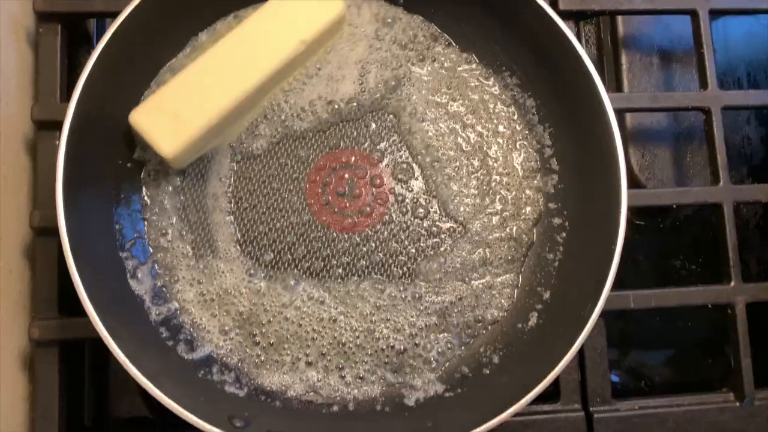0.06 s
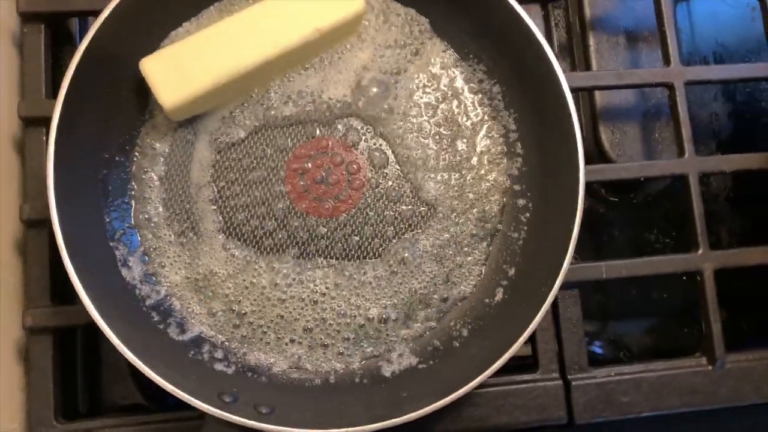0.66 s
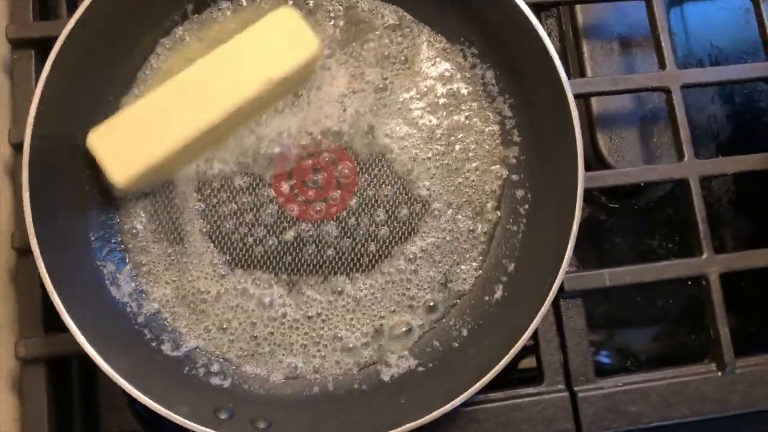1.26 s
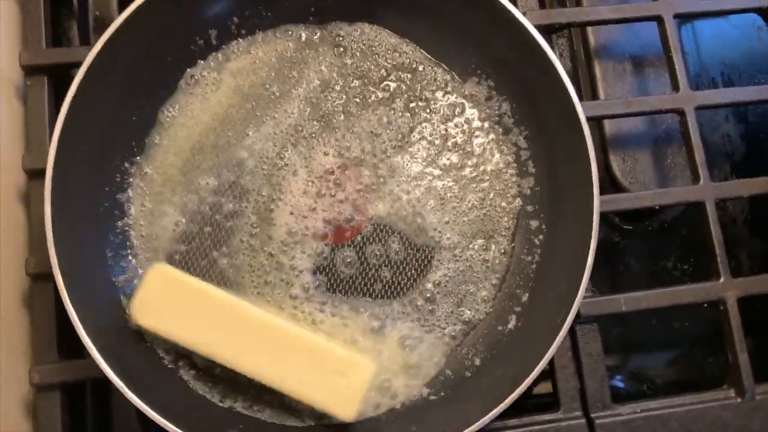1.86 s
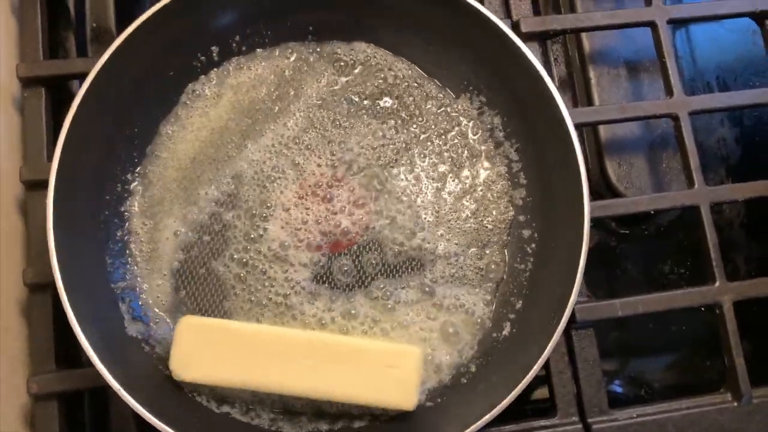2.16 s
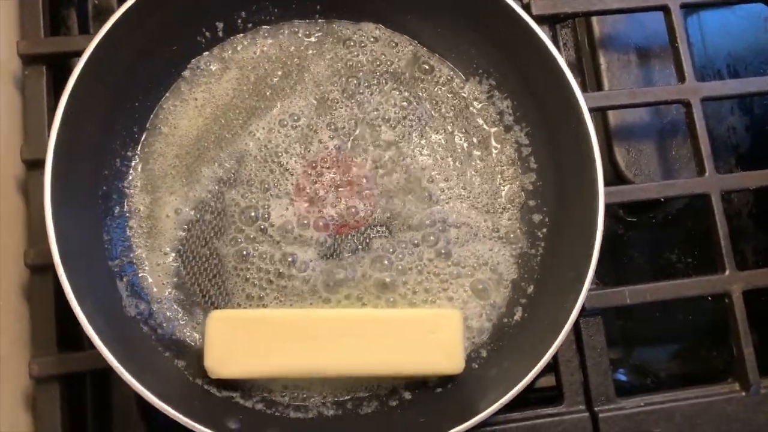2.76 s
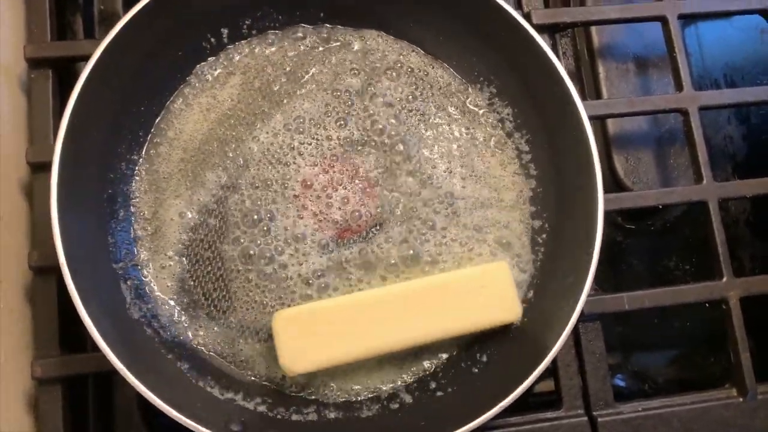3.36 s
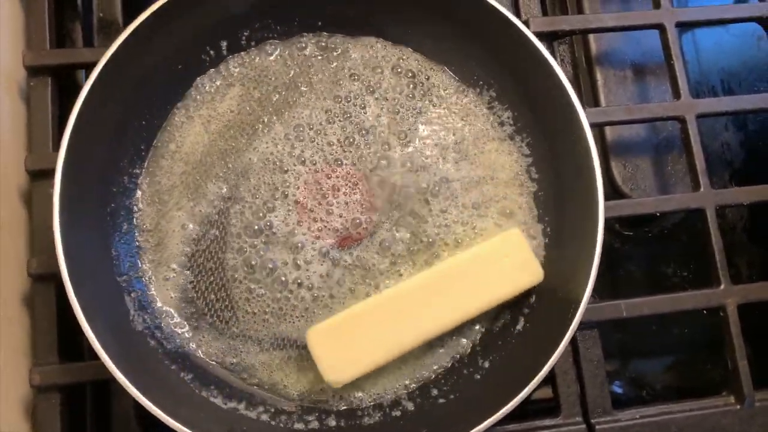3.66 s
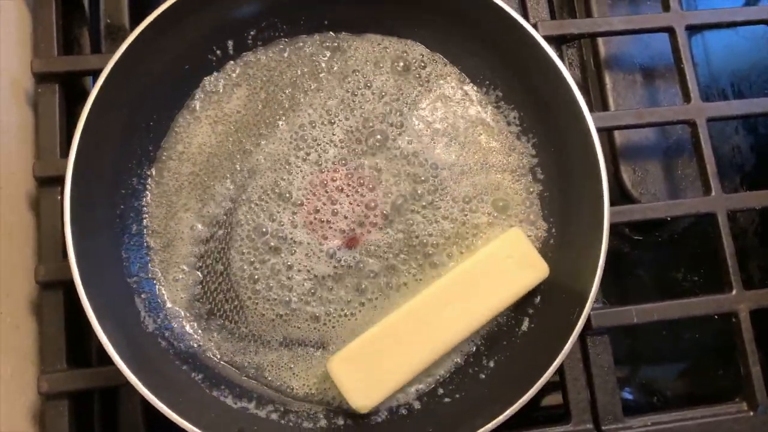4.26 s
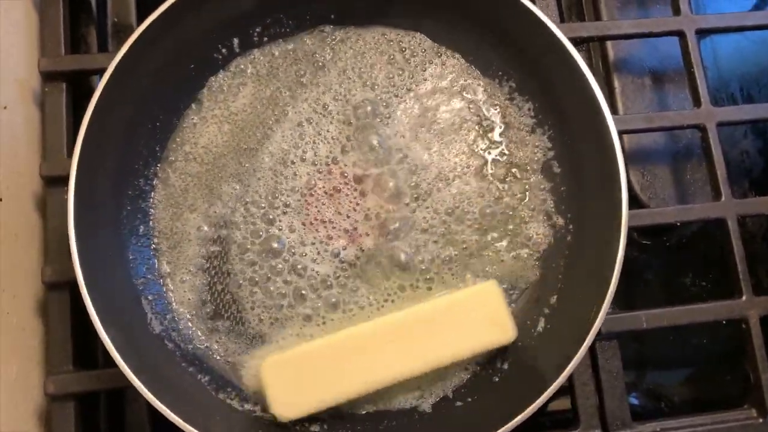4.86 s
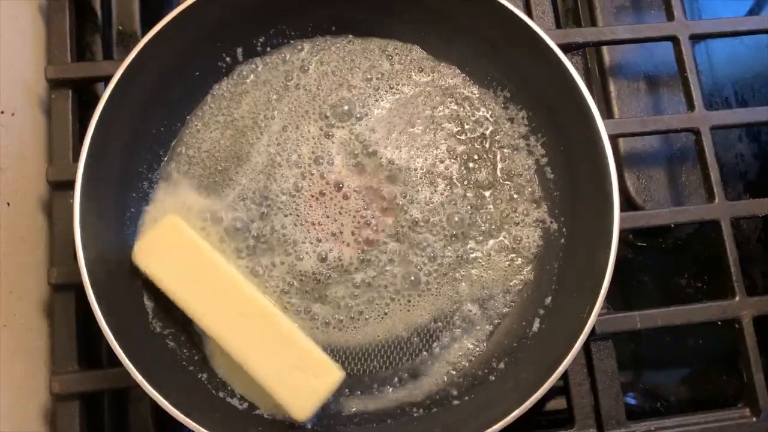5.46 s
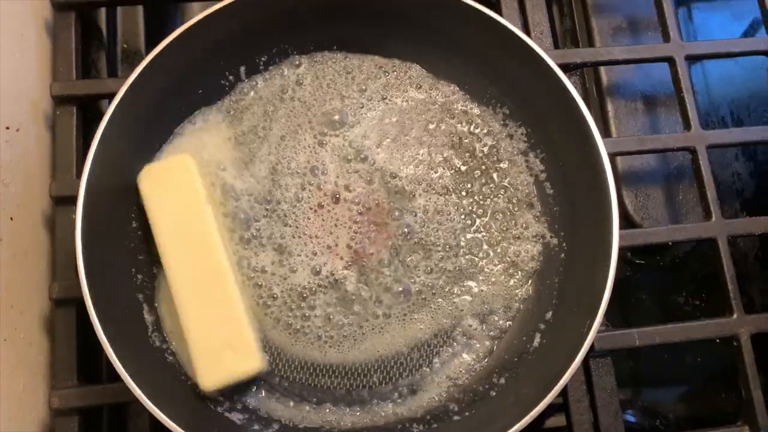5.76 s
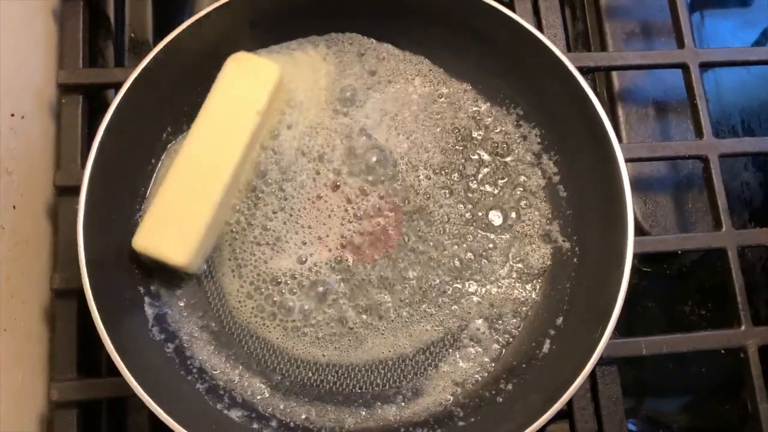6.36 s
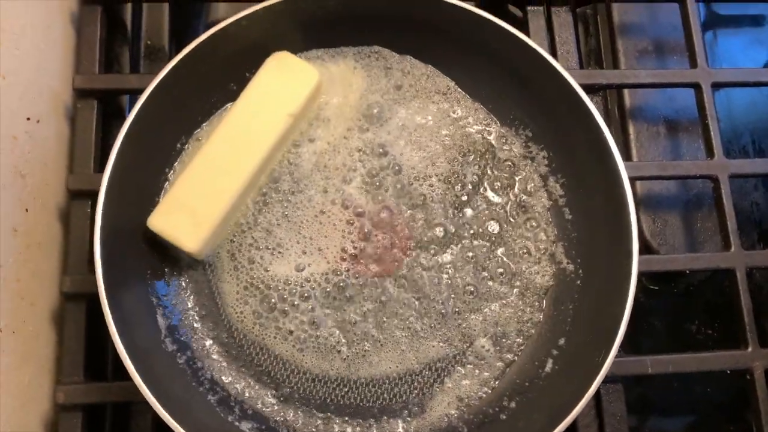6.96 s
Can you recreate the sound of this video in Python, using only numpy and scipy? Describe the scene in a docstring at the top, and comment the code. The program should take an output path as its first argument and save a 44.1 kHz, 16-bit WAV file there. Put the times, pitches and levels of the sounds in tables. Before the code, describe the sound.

Butter sizzles in a frying pan on a gas stove, a steady bright hiss of tiny bursting bubbles with sharp little spits and brief spurts of steam. Three times the pan knocks and rocks on the iron grate, with short metallic clacks and hollow thuds. The sizzle grows loudest near the end. A low burner murmur lies underneath, heard through a close stereo microphone in a small kitchen.

```python
"""Butter sizzles in a frying pan: countless small steam bubbles burst in the foam, some ring, a few spit
louder, and trapped steam escapes in crackling spurts. The pan is tilted about on the iron grate of a gas
stove; now and then it knocks and rocks, ringing with the bar it touches, and the hollow stove thuds.
The stove murmurs underneath. Close stereo microphone, small kitchen."""
import sys
import numpy as np
from scipy import signal
from scipy.fft import rfft, irfft, next_fast_len
from scipy.io import wavfile

SR = 44100
rng = np.random.default_rng(int(sys.argv[2]) if len(sys.argv) > 2 else 0)


def generate_wav(sig):
    """Save sig (samples, or channels by samples) to the path in sys.argv[1] as 16-bit PCM at SR."""
    pcm = np.round(np.clip(np.atleast_2d(sig).T, -1, 1) * 32767).astype(np.int16)
    wavfile.write(sys.argv[1], SR, pcm)


N = 309140
FFT_SIZE = next_fast_len(N + SR)
FREQ_HZ = np.maximum(np.arange(FFT_SIZE // 2 + 1) * SR / FFT_SIZE, 1)
TIME_S = np.arange(N) / SR

# burner and kitchen (frequency [Hz], relative density [dB])
MURMUR_SPECTRUM = [(15, -53), (25, -61), (47, -1.5), (102, -1.5), (134, -7.5), (171, -4.5), (197, -16),
                   (251, -1), (393, -12.5), (426, -10.5), (516, -28), (559, -11.5), (689, -17.5),
                   (835, -20), (1150, -24.5), (1500, -19), (2530, -120)]
# faint hum (time [s], level [dB])
HUM_LEVEL = [(0, -56), (5.2, -79), (5.8, -53), (7, -52.5)]
# hollow stove under a blow (frequency [Hz], relative density [dB])
THUD_SPECTRUM = [(45, -36), (80, -5), (130, -1), (175, -1), (225, -1.5), (320, 4), (520, -9), (800, -12.5),
                 (1600, -18), (3000, -39)]
# pan lands or rocks onto another bar; levels relative (time [s], blow [dB], contact cutoff [Hz],
# rattle [dB], bar pitch [Hz], bar level [dB], bar t60 [s], partial 2 [Hz], level 2 [dB],
# partial 3 [Hz], level 3 [dB], stove heave [dB], stove thud [dB], free ring [dB])
KNOCKS = [(0.439, -26.5, 2500, -11, 1000, -13, 0.049, 1786, -27, 2030, -33, -50, -30, -31),
          (0.537, -31, 2380, 1, 1040, -18, 0.062, 1265, -27, 2100, -31, -54, -34.5, -12),
          (0.684, -21, 4300, 1, 876, -18, 0.069, 1900, -20.5, 2770, -27, -36.5, -30, -19),
          (0.762, -35.5, 1510, -1, 830, -40, 0.062, 1600, -44, 1870, -43, -45, -41.5, -31),
          (2.021, -50, 650, 1, 554, -34.5, 0.1, 1110, -56, 1500, -58, -49, -45.5, -51),
          (2.104, -25.5, 2100, -3, 844, -13, 0.14, 1533, -22.5, 1635, -25, -39, -36, -48),
          (2.207, -39, 1500, 5, 870, -32, 0.053, 1030, -36, 1560, -49, -41.5, -46.5, -47),
          (3.865, -34, 1350, 6, 797, -27, 0.16, 712, -27, 1276, -35, -58, -43, -52),
          (3.955, -40, 1300, 0, 796, -29.5, 0.07, 712, -34, 1280, -41, -60, -53, -56),
          (4.1242, -23.5, 2140, 8, 815, -17.5, 0.058, 1680, -25, 683, -31, -36.5, -35, -29),
          (4.176, -33, 1100, 1, 815, -33, 0.056, 710, -33, 1716, -42, -57, -48, -47)]
# struck pan and grate (frequency [Hz], relative level [dB], t60 [s])
PAN_MODES = [(173.6, -9.5, 0.18), (331, -6, 0.32), (460, -1.5, 0.14), (555, 0, 0.14), (730, -3, 0.056),
             (815, -7.5, 0.16), (996, -7.5, 0.16), (1283, -3.5, 0.055), (1478, -1.5, 0.09),
             (1594, -11, 0.26), (1750, -12, 0.16), (1820, -10, 0.29), (1980, -27, 0.28), (2410, -22, 0.17),
             (2616, -11, 0.099), (2897, -5, 0.12), (3430, -12, 0.22), (3710, -13, 0.22), (3700, -1, 0.07),
             (3920, -5, 0.065), (3960, -11, 0.19)]
# pan lifting off a bar (frequency [Hz], relative level [dB], t60 [s])
FREE_MODES = [(171.5, -6, 0.3), (560, -3, 0.26)]
# pan stirred by the frying (frequency [Hz], level [dB], t60 [s])
SINGING_MODES = [(827, -61.5, 0.082), (1005, -65.5, 0.064), (1546, -64.5, 0.025)]
# steam escapes (time [s], swell [s], level [dB], centre [Hz])
SPURTS = [(0.195, 0.0067, -30, 12500), (0.208, .004, -33, 6860), (0.262, 0.005, -29, 3800),
          (1.030, .006, -38, 3500), (1.089, 0.0087, -36, 3740), (1.150, 0.011, -41, 3630),
          (1.315, 0.0086, -40, 3700), (1.348, 0.0042, -44, 6800), (1.372, 0.0058, -47, 3300),
          (1.439, .005, -35.5, 6300), (1.792, 0.0051, -33, 12000), (2.327, 0.0054, -33, 12500),
          (2.541, .004, -32, 12000), (3.361, .003, -29, 11900), (3.465, .004, -32, 4200),
          (3.631, .004, -29.5, 12000), (3.849, .003, -36, 12500), (4.119, .012, -42, 4100),
          (4.296, .005, -33, 12600), (5.006, 0.0028, -41, 12000), (5.06, 0.0027, -32, 12000),
          (5.061, 0.0055, -30, 5800), (5.064, 0.0056, -32, 4000), (5.442, 0.0052, -37, 4500),
          (5.455, 0.0061, -40, 12500), (5.722, 0.0023, -38, 12500), (6.119, .007, -33, 12600),
          (6.772, .004, -27, 4600)]
# loudest spits of fat (time [s], relative peak [dB], pitch [Hz])
SPITS = [(0.090, -24, 7000), (0.214, -19, 6900), (0.379, -23, 8500), (0.7103, -20, 6330),
         (0.8046, -17.5, 6940), (0.829, -24, 7500), (0.8445, -16.5, 8200), (0.9073, -23, 6610),
         (0.921, -19, 13000), (0.9517, -18.5, 6890), (1.006, -25, 7700), (1.054, -23, 7400),
         (1.100, -22, 7300), (1.1283, -23, 7140), (1.1915, -19, 11500), (1.4935, -24, 12500),
         (1.541, -23, 8900), (1.5705, -25, 12500), (1.918, -20, 6250), (2.2498, -21, 6730),
         (2.3171, -17, 6950), (2.349, -19, 6800), (2.4264, -21, 7990), (2.5426, -20, 6190),
         (2.7107, -20, 6470), (3.3643, -22, 6900), (3.560, -21, 11500), (3.8501, -21, 6170),
         (3.851, -18, 12500), (3.8675, -21, 12000), (3.9784, -19, 6270), (4.0996, -19.5, 6240),
         (4.1755, -22, 12000), (4.1815, -19, 7300), (4.2255, -20, 6800), (4.4812, -22, 7220),
         (4.5984, -21, 6600), (4.5995, -19.5, 9500), (4.7357, -21, 11500), (5.0095, -19.5, 6910),
         (5.0105, -21, 11500), (5.0609, -22, 6310), (5.225, -24, 6790), (5.236, -23, 6500),
         (5.3835, -20, 11500), (5.497, -22, 8200), (5.5755, -19.5, 11000), (5.7074, -20, 6300),
         (5.7235, -18, 12000), (5.8935, -19.5, 6730), (6.2287, -19, 6140), (6.3185, -17, 6330),
         (6.4502, -17, 7100), (6.8947, -14, 7240)]
# tone of the frying (frequency [Hz], gain [dB])
FRY_SPECTRUM = [(1000, -19.5), (1600, -10), (1950, -13.5), (2300, -4), (3100, -5), (3800, -2), (4650, 3.5),
                (5250, -1.1), (6300, 4.5), (7300, 0.24), (8500, -1.5), (10300, -6), (13000, -3),
                (15500, -17.5)]
# frying surges as melted butter runs onto hot metal (time [s], vigour [dB])
VIGOUR = [(0.01, -36), (0.6, -37.5), (1.13, -37.5), (1.25, -39.5), (1.35, -38), (1.53, -40.5),
          (1.99, -32.5), (2.15, -35.5), (2.33, -30.5), (2.47, -33.5), (2.93, -31.5), (3.19, -34),
          (3.7, -34), (4.27, -34.5), (4.41, -36), (4.59, -33.5), (4.68, -38), (4.97, -39), (5.11, -36),
          (5.33, -38), (5.44, -32.5), (5.63, -34), (6.12, -30), (6.39, -27), (6.62, -27.5), (6.92, -26)]
# large bubbles to fine spray (pitch [Hz], change under foam [dB], growth in fierce frying [dB/dB])
BUBBLES = [(2050, 4, 0), (3740, 7.5, -0.43), (4430, 11.5, 0.44), (6980, 0, 1.2954), (13300, -11, 1.11)]
# low noise, left against right (frequency [Hz], correlation [-1..1])
LOW_CORRELATION = [(60, 0.89), (250, 0.91), (420, 0.16), (620, -0.48), (1000, -0.67), (1500, 0.016)]
# pan to microphone (frequency [Hz], left lead [rad], left minus right [dB])
PAN_PATH = [(100, 0, 0), (380, -.3, 0), (560, -1.6, -4), (850, -1.9, -7), (1050, -1.1, -3), (1500, .7, -3),
            (1900, .6, -3), (4000, 1.2, -1.5)]
# frying to microphone (frequency [Hz], left lead [rad])
FRY_LEAD = [(0, 0), (700, -2), (1500, .7), (1900, .4), (2200, -3.2), (4850, -3.14), (7300, 0),
            (22050, 18.35)]
# frying that arrives directly (frequency [Hz], power share [0..1])
DIRECT_SHARE = [(1000, 0.45), (2200, 0.7), (3000, 0.1), (3800, 0.3), (4650, 0.9), (5400, 0.55), (6500, .9),
                (15000, .92)]
# whole kitchen (frequency [Hz], left minus right [dB])
BALANCE = [(60, -1), (200, -2.5), (380, 3), (700, -1), (1300, -2.5), (2400, -0.5), (5000, -0.3)]

BUBBLE_HZ = [row[0] for row in BUBBLES]
PIP_LOW_HZ, PIP_HIGH_HZ = 2600, 15000


def from_db(db):
    """Decibels to gain."""
    return 10 ** (np.asarray(db) / 20)


def unit_rms(x):
    """Scale to unit power."""
    return x / np.sqrt(np.mean(x ** 2) + 1e-20)


def over_time(table):
    """Time curve at every sample."""
    return np.interp(TIME_S, *np.transpose(table))


def at_hz(table, hz):
    """Table lookup on a log-frequency axis."""
    table_hz, values = np.transpose(table)
    return np.interp(np.log(hz), np.log(table_hz), values)


def shaped(x, response):
    """Filter by a frequency response."""
    return irfft(rfft(x, FFT_SIZE) * response, FFT_SIZE)[..., :N]


def butter(x, order, edge_hz, kind="low"):
    """Maximally flat filter."""
    return signal.sosfilt(signal.butter(order, edge_hz, kind, fs=SR, output="sos"), x)


def drift(rate_hz):
    """Smooth random curve, unit RMS."""
    hop, settle = 40, 2000
    r = np.exp(-2 * np.pi * rate_hz * hop / SR)
    slow = signal.lfilter([1], [1, -2 * r, r * r], rng.standard_normal(N // hop + settle + 2))[settle:]
    return np.interp(np.arange(N) / hop, np.arange(len(slow)), unit_rms(slow))


def ring(drive, hz, t60_s):
    """Resonator: a unit click starts a decaying unit sine."""
    r, w = from_db(-60 / (t60_s * SR)), 2 * np.pi * hz / SR
    return signal.lfilter([0, np.sin(w)], [1, -2 * r * np.cos(w), r * r], drive + 1e-18)


def add(out, time_s, sound):
    """Mix a sound in at time_s."""
    start = int(np.clip(round(time_s * SR), 0, N - 1))
    out[start:start + len(sound)] += sound[:N - start]


def low_noise(spectrum):
    """Coloured stereo noise, alike on both sides in the bass."""
    mid, side = rng.standard_normal((2, N))
    alike = at_hz(LOW_CORRELATION, FREQ_HZ)
    rolloff = (1 + (FREQ_HZ / spectrum[-1][0]) ** 4) * (1 + (20 / FREQ_HZ) ** 4)
    gain = from_db(at_hz(spectrum, FREQ_HZ)) / rolloff
    mid, side = shaped(mid, gain * np.sqrt(1 + alike)), shaped(side, gain * np.sqrt(1 - alike))
    return unit_rms(mid + side * [[1], [-1]])


def kitchen(t60_s=0.25, near_s=0.006, near_db=8):
    """Stereo room response: dense reflections off the stove, then a soft tail."""
    t = TIME_S[:SR // 2]
    fade = (from_db(-60 * t / t60_s) + from_db(near_db) * np.exp(-t / near_s)) * (t > 0.001)
    echoes = rng.standard_normal((2, len(t))) * fade
    return rfft(echoes / np.sqrt(np.sum(echoes ** 2, axis=1, keepdims=True)), FFT_SIZE)


def murmur(hum_hz=103):
    """Steady noise of burner and kitchen, plus a faint hum."""
    hum = np.sqrt(2) * np.sin(2 * np.pi * hum_hz * TIME_S + 0.18 * drift(0.64))
    return from_db(-47.5) * low_noise(MURMUR_SPECTRUM) + from_db(over_time(HUM_LEVEL)) * hum


def stove_heaves(hz=73.7, delay_s=0.0592, swell_s=0.022):
    """The stove gives under the pan's weight and sways for a few cycles."""
    out, t = np.zeros(N), TIME_S[:SR // 2]
    sway = np.sin(2 * np.pi * hz * t) * t / swell_s * np.exp(1 - t / swell_s)
    for time_s, *_, heave_db, _, _ in KNOCKS:
        add(out, time_s + delay_s, from_db(heave_db) * sway)
    return out


def stove_thuds(rise_s=0.0072, t60_s=0.39):
    """The hollow stove answers each knock and rumbles on."""
    power, t = np.zeros(N), TIME_S[:SR]
    swell = from_db(-60 * t / t60_s) * (1 - np.exp(-t / rise_s)) ** 2
    for time_s, *_, thud_db, _ in KNOCKS:
        add(power, time_s, (from_db(thud_db) * swell) ** 2)
    return np.sqrt(power) * low_noise(THUD_SPECTRUM)


def pan_singing(vigour_exponent=0.63):
    """Bursts on the pan's floor keep a few modes faintly ringing."""
    modes = sum(from_db(db) * unit_rms(ring(rng.standard_normal(N), hz, t60_s))
                for hz, db, t60_s in SINGING_MODES)
    return modes * unit_rms(from_db(over_time(VIGOUR)) ** vigour_exponent)


def pan_knocks(crack_db=3, crack_s=0.004, rattle_s=0.03, rattle_hz=2120, partial_t60_s=0.083,
               free_rise_s=0.028):
    """The pan cracks onto a bar, rattles, rings with it, and swells into a free ring as it lifts."""
    out, t = np.zeros(N), TIME_S[:SR // 2]
    click = t == 0
    body, free = (sum((-1) ** k * from_db(db) * ring(click, hz, t60_s)
                      for k, (hz, db, t60_s) in enumerate(modes)) for modes in (PAN_MODES, FREE_MODES))
    free *= 1 - np.exp(-t / free_rise_s)
    for time_s, blow_db, contact_hz, rattle_db, *bar_columns, _, _, free_db in KNOCKS:
        hz1, db1, bar_t60_s, hz2, db2, hz3, db3 = bar_columns
        partials = (hz1, db1, bar_t60_s), (hz2, db2, partial_t60_s), (hz3, db3, partial_t60_s)
        bar = sum(from_db(db) * ring(click, hz, t60_s) for hz, db, t60_s in partials)
        fade = from_db(crack_db) * np.exp(-t / crack_s) + from_db(rattle_db) * np.exp(-t / rattle_s)
        rattle = butter(fade * rng.standard_normal(len(t)), 2, rattle_hz)
        clack = butter(body + rattle, 6, contact_hz)  # soft contact: quiet high modes
        add(out, time_s, from_db(blow_db) * clack + bar + from_db(free_db) * free)
    return out


def steam_spurts(width_oct=0.64, crackle_db=5):
    """A steam jet swells and dies, tearing the fat into tiny ticks."""
    out, t = np.zeros(N), TIME_S[:SR // 8]
    for time_s, swell_s, level_db, hz in SPURTS:
        ticks = rng.standard_normal(len(t))
        ticks *= from_db(crackle_db * np.minimum(rng.exponential(1, len(t)), 4))
        jet = unit_rms(butter(ticks, 2, [hz / 2 ** (width_oct / 2), hz * 2 ** (width_oct / 2)], "band"))
        add(out, time_s, from_db(level_db) * jet * t / swell_s * np.exp(1 - t / swell_s))
    return out


def spits(rise_cycles=2.54, crack_db=-3):
    """A larger bubble snaps: a few cycles at its pitch and a broad crack."""
    out, t = np.zeros(N), TIME_S[:SR // 100]
    for time_s, peak_db, hz in SPITS:
        age = t * hz / rise_cycles
        crack = from_db(crack_db) * butter(rng.standard_normal(len(t)), 2, 4000, "high")
        snap = (np.sin(2 * np.pi * hz * t) + crack) * age * np.exp(-age)
        add(out, time_s, from_db(peak_db) * snap / np.abs(snap).max())
    return out


def bubble_swells(fierce_db=-35, foam_start_s=0.28, foam_spread_s=2.0):
    """Gain per bubble size over time, from vigour and from the foam that the sliding butter spreads."""
    vigour_db = over_time(VIGOUR)
    gentle_db, excess_db = np.minimum(vigour_db, fierce_db), np.maximum(vigour_db - fierce_db, 0)
    cover = np.clip((TIME_S - foam_start_s) / foam_spread_s, 0, 1)
    return np.array([unit_rms(from_db(gentle_db + growth * excess_db + foam_db * cover))
                     for _, foam_db, growth in BUBBLES])


def bubble_pips(per_s=520, decay_cycles=17, spread_db=11, glide=0.003):
    """Some bubbles ring briefly as they open, rising slightly in pitch."""
    out, t = np.zeros(N), TIME_S[:SR // 45]
    swells = bubble_swells()
    for when, pitch, size, length in rng.random((int(per_s * N / SR), 4)):
        hz = PIP_LOW_HZ + pitch * (PIP_HIGH_HZ - PIP_LOW_HZ)
        age = t * hz / (decay_cycles * (0.5 + length))
        swell = at_hz(list(zip(BUBBLE_HZ, swells[:, int(when * N)])), hz)
        gain = swell * from_db(at_hz(FRY_SPECTRUM, hz) + spread_db * size ** 2)
        tone = np.sin(2 * np.pi * hz * t * (1 + glide * np.minimum(age, 10)))
        add(out, when * N / SR, gain * tone * np.exp(-age) * (1 - np.exp(-10 * age)))
    return unit_rms(out)


def foam(base_per_s=5000, spread_db=5, width_oct=0.21, clump_db=3, haze_db=-1, haze_dip_db=2,
         cluster_db=2, reference_hz=6980):
    """Bubbles tick in clumps over a haze of tiny ones. Rows: bursts, left wash, right wash."""
    swells = bubble_swells()
    # bursts thicken as foam spreads, thin a little in the fiercest frying
    rate_per_s = base_per_s * swells[1] ** 1.1
    clumps = drift(70)  # one burst sets off its neighbours
    onsets = np.flatnonzero(rng.random(N) < rate_per_s * from_db(clump_db * clumps) / SR)
    size = from_db(spread_db * np.minimum(rng.exponential(1, N), 2.58))
    height = (size * rng.choice([-1, 1], N) / np.sqrt(rate_per_s))[onsets]
    pitch_oct = rng.uniform(np.log2(600), np.log2(24000), N)[onsets]
    edges_hz, out = np.geomspace(700, 17000, 24), np.zeros((3, N))
    white = rng.standard_normal((2, 3, N))
    for k, (low_hz, high_hz) in enumerate(zip(edges_hz, edges_hz[1:])):
        hz, ticks, drive = np.sqrt(low_hz * high_hz), np.zeros(N), white[k % 2].copy()
        ticks[onsets] = height * np.exp(-0.5 * ((pitch_oct - np.log2(hz)) / width_oct) ** 2)
        # large bubbles burst more softly, in looser clusters
        haze = from_db(haze_db - haze_dip_db * clumps) * (reference_hz / hz) ** 0.026 * drive[0]
        clusters = from_db(cluster_db * np.sqrt(reference_hz / max(hz, PIP_LOW_HZ)) * drift(25))
        drive[0] = unit_rms(unit_rms(ticks) + haze)
        weights = [at_hz(list(zip(BUBBLE_HZ, row)), hz) for row in np.eye(len(BUBBLES))]
        band = butter(drive, 2, [low_hz, high_hz], "band")
        out += (-1) ** k * band * np.dot(weights, swells) * clusters
    return unit_rms(shaped(out, from_db(at_hz(FRY_SPECTRUM, FREQ_HZ))))


def scene():
    """Frying and knocks reach the microphone directly and via the room, over the stove's low sounds."""
    sides = np.array([[0.5], [-0.5]])
    room, second_spot_room = kitchen(), kitchen()
    frying = from_db(-32) * foam()
    bursts, wash = frying[0] + from_db(-38.5) * bubble_pips(), frying[1:]
    fry_path = np.exp(1j * np.interp(FREQ_HZ, *np.transpose(FRY_LEAD)) * sides)
    direct_share = at_hz(DIRECT_SHARE, FREQ_HZ)
    # indirect power: half smooth wash, half echoes that vary with the spot in the pan
    indirect_gain, spot_rad = np.sqrt((1 - direct_share) / 2), np.pi * drift(19.5)
    echoes = shaped(bursts * np.cos(spot_rad), indirect_gain * room)
    echoes += shaped(bursts * np.sin(spot_rad), indirect_gain * second_spot_room)
    sizzle = shaped(bursts, np.sqrt(direct_share) * fry_path) + echoes + shaped(wash, indirect_gain)
    snaps = shaped(from_db(3.3) * spits() + steam_spurts(), fry_path + from_db(-14) * room)

    hz, lead_rad, left_db = np.transpose(PAN_PATH)
    pan_path = np.exp(1j * np.interp(FREQ_HZ, hz, lead_rad) * sides)
    pan_path *= from_db(np.interp(FREQ_HZ, hz, left_db) * sides)
    pan = shaped(from_db(-4.5) * pan_knocks() + pan_singing(), pan_path + from_db(-15) * room)
    stove = from_db(6.5) * stove_thuds() + stove_heaves()
    return shaped(sizzle + snaps + pan + stove + murmur(), from_db(at_hz(BALANCE, FREQ_HZ) * sides))


def record(dry):
    """Steep low-pass."""
    cutoff_hz = 15750
    return signal.sosfilt(signal.ellip(12, 0.1, 80, cutoff_hz, fs=SR, output="sos"), dry)


dry = scene()
out = record(dry)
generate_wav(out)
```